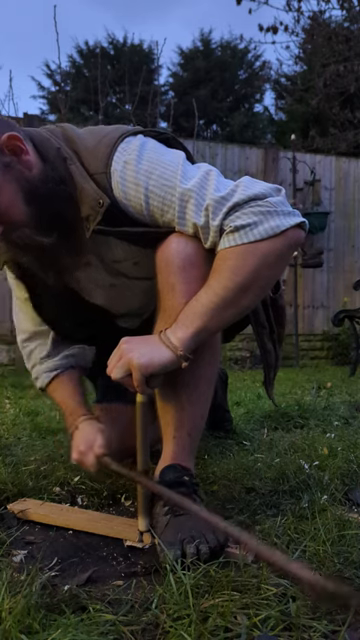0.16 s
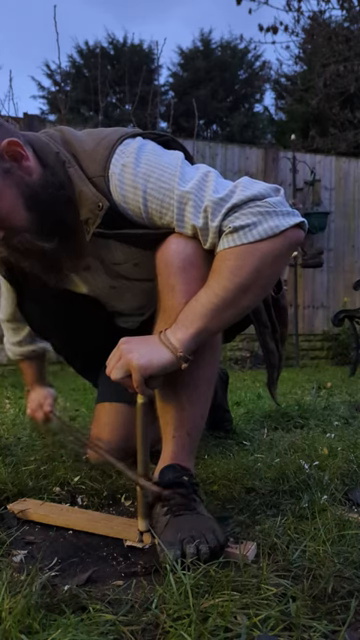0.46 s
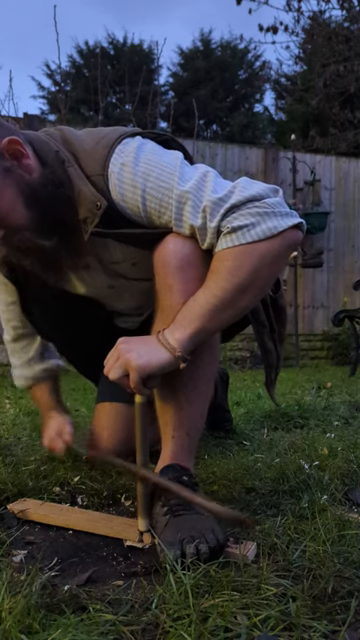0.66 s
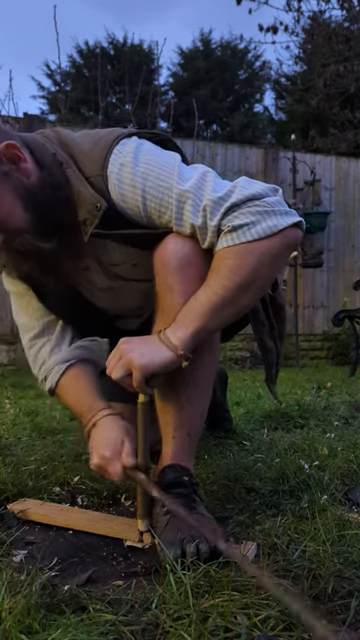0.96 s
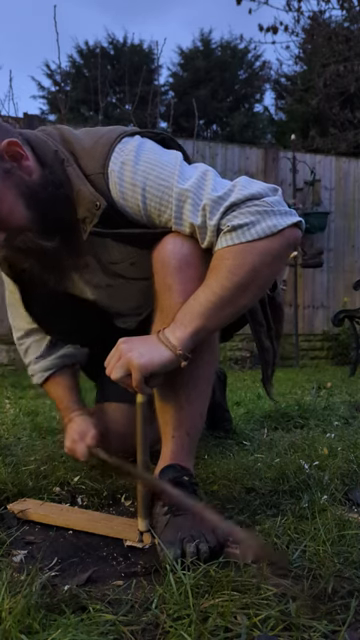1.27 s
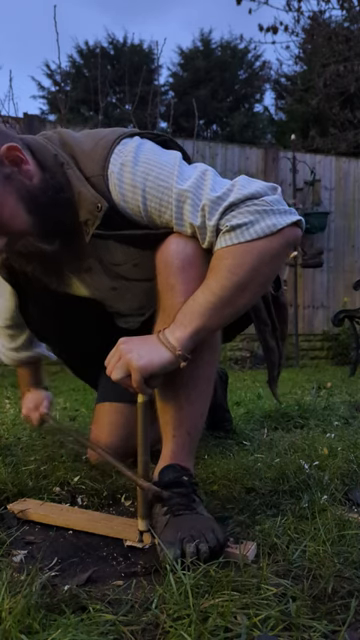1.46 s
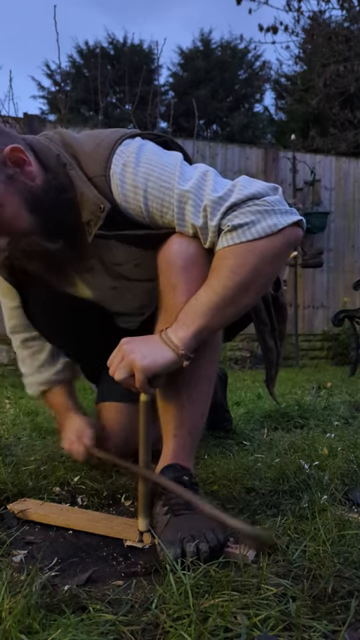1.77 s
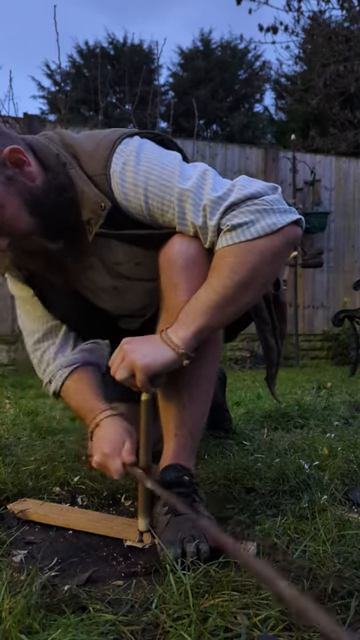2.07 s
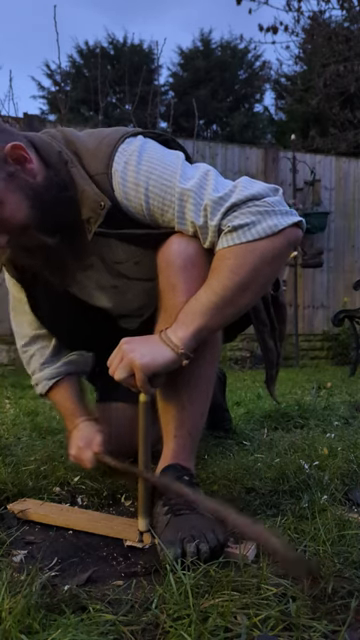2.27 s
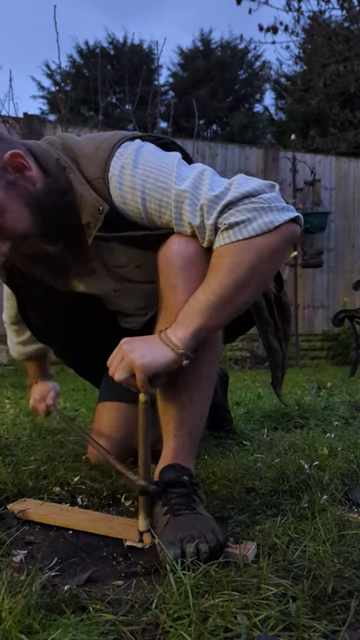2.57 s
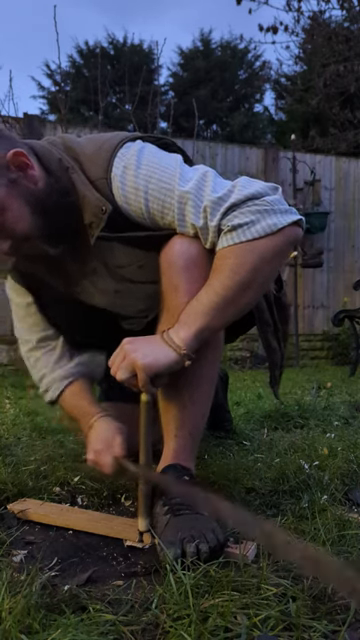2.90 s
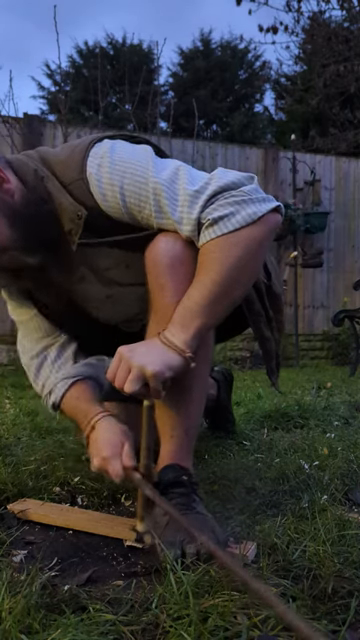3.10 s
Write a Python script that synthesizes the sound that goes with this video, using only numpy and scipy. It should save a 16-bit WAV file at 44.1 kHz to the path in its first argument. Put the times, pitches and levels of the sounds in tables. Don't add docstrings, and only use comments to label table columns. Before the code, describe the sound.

Hissing back-and-forth strokes of a spindle rubbing in a wooden notch, with rattling woody knocks

```python
import sys
import numpy as np
from scipy import signal
from scipy.fft import rfft, irfft
from scipy.io import wavfile

SR = 44100
rng = np.random.default_rng(int(sys.argv[2]) if len(sys.argv) > 2 else 0)


def nominal_scale(level):
    x = np.asarray(level, float) / 20
    return 10 ** x


def pcm_store(signal):
    levels = np.round(np.clip(np.atleast_2d(signal), -1, 1) * 32767)
    wavfile.write(sys.argv[1], SR, levels.astype(np.int16).T)


N = 142884


def at_hz(points, hz):
    table_hz, value = np.array(points)[:, :2].T
    return np.interp(np.log(hz + 1), np.log(table_hz), value)


def rms_one(x):
    return x / np.sqrt(np.mean(x ** 2) + 1e-20)


def drift(rate):
    hop, settle = 40, 2000
    r = np.exp(-2 * np.pi * rate * hop / SR)
    noise = rng.standard_normal(N // hop + settle + 2)
    slow = signal.lfilter([1], [1, -2 * r, r * r], noise)[settle:]
    return np.interp(np.arange(N) / hop, np.arange(len(slow)), rms_one(slow - slow.mean()))


def window(start, end, edge_s):
    t = np.arange(N) / SR
    opening = 1 + np.tanh((t - start) / edge_s)
    closing = 1 + np.tanh((end - t) / edge_s)
    return opening * closing / 4


# f/Hz, likeness (0 to 1)
PORT_LIKENESS = [(100, 1), (600, 0.83), (1600, 0.55), (2100, 0.4), (4100, 0.55), (5000, 0.24), (9100, 0.32),
                 (11000, 0.078)]


def patchy(sources, colour_db, patchy_db, rate):
    hz = np.fft.rfftfreq(N, 1 / SR)
    alike = np.clip(at_hz(PORT_LIKENESS, hz), 0, 1)
    shared, *own = rfft(sources)
    pair = nominal_scale(colour_db) * (np.sqrt(alike) * shared + np.sqrt(1 - alike) * np.array(own))
    place = 3 * np.log2(hz / 20 + 1e-9)
    out = 0
    for k in range(30):
        flicker = nominal_scale(patchy_db * drift(rate))
        band = np.clip(1 - abs(place - k), 0, 1)
        out = out + flicker * irfft(pair * band, N)
    return rms_one(out)


# start t/s, end t/s, hiss level/dB, swell over the stroke level/dB, rise t/s
BOW_STROKES = [
    (-.02, .53, -38, 9, 0.074),
    (.55, 1.06, -37, 2, 0.064),
    (1.05, 1.57, -37.5, 8.5, 0.047),
    (1.61, 2.12, -38, -2, 0.079),
    (2.06, 2.60, -36.5, 7.5, 0.14),
    (2.62, 3.14, -37, 3, 0.065),
    (3.145, 3.6, -42.5, -9, 0.097),
]


def bow():
    t, power = np.arange(N) / SR, np.zeros(N)
    for k, (start, end, db, swell_db, rise_s) in enumerate(BOW_STROKES):
        stop_s, stop_power = [(0.07, 1.8), (0.15, 1.3)][k % 2]
        length_s = end - start
        u = np.clip((t - start) / length_s, 0, 1)
        spin_up = np.tanh(u * length_s / rise_s) ** 1.33
        slow_down = np.tanh((1 - u) * length_s / stop_s) ** stop_power
        power += (spin_up * slow_down * nominal_scale(db + swell_db * (u - .5))) ** 2
    return np.sqrt(power)


# f/Hz, level/dB per Hz
TIP_HISS = [(250, -16.5), (900, -14), (1800, -9), (3300, -14), (5200, -11), (8000, -7.5), (10500, -12.5),
            (15500, -12)]
# f/Hz, width f/Hz, level/dB, left minus right level/dB
NOTCH_RESONANCES = [(1134, 280, 8, 0.5), (1450, 220, 8.5, -0.5), (2195, 470, 2.5, -2.5),
                    (2682, 426, 9, -5.5), (3890, 1230, 5.5, -1), (5050, 320, -3.5, -1.5),
                    (6240, 600, 4, -0.5), (6680, 590, 3.5, -8), (7610, 280, 2.5, -0.5),
                    (8810, 546, 7.5, -2), (9140, 320, -5.5, -1), (11500, 640, 3, 1), (13000, 1300, 4, 1)]


def rub(speed):
    grit_per_s, grit_share = 3500, 0.28
    hz = np.fft.rfftfreq(N, 1 / SR)
    colour_db = at_hz(TIP_HISS, hz)
    for f, width_hz, db, side_db in NOTCH_RESONANCES:
        port_db = db + side_db * np.array([[.5], [-.5]])
        colour_db = colour_db + port_db / (1 + (2 * (hz - f) / width_hz) ** 2)
    grit = rms_one((rng.random(N) < grit_per_s / SR) * rng.laplace(size=N))
    noise = rng.standard_normal((3, N))
    noise[0] += grit_share * grit
    unsteady = nominal_scale(.7 * drift(25))
    return speed * unsteady * patchy(noise, colour_db, patchy_db=1.3, rate=16)


# t/s, f/Hz, level/dB
ENGINE = [
    (0, 64.2, -50.5),
    (.5, 62.57, -52.5),
    (1.1, 65.34, -52),
    (1.7, 64.36, -50.5),
    (2.1, 62.9, -47.5),
    (2.45, 58, -51.5),
    (2.9, 54.95, -52.5),
    (3.02, 55, -64),
    (3.24, 55, -72),
]


def hum():
    s, hz, db = np.transpose(ENGINE)
    t = np.arange(N) / SR
    pitch_hz = np.interp(t, s, hz) + .9 * drift(5)
    level_db = np.interp(t, s, db) + 2.5 * drift(18)
    phase = 2 * np.pi * np.cumsum(pitch_hz) / SR
    return np.sqrt(2) * nominal_scale(level_db) * np.sin(phase)


# f/Hz, level/dB per Hz
GARDEN_AIR = [(25, -31), (45, -5), (100, -2), (300, -8), (600, -16), (1500, -20), (4000, -25.5),
              (15000, -34.5)]


def air():
    level_db = -53
    colour_db = at_hz(GARDEN_AIR, np.fft.rfftfreq(N, 1 / SR))
    return nominal_scale(level_db) * patchy(rng.standard_normal((3, N)), colour_db, patchy_db=0.9, rate=1)


def ring(clicks, hz, t60):
    r, w = nominal_scale(-60 / (t60 * SR)), 2 * np.pi * hz / SR
    return signal.lfilter([0, np.sin(w)], [1, -2 * r * np.cos(w), r * r], clicks + 1e-18)


# f/Hz, level/dB, time to fall 60 dB t/s
SPINDLE_TONES = [(648, -7.5, 0.016), (910, -9.5, 0.005), (960, -4, .015), (1140, -5, 0.015),
                 (1260, -6, 0.02), (1430, -12, 0.045), (1560, -3.5, 0.023), (2130, 7, 0.0073),
                 (2540, 2, 0.0027)]
# f/Hz, level/dB, time to fall 60 dB t/s
BOARD_TONES = [(229, -10.5, 0.076), (300.6, 0.5, 0.11), (337, 0, 0.044), (384.6, -3, 0.073),
               (566, 3, 0.044), (670, 3.5, 0.022)]
# start t/s, end t/s, spindle level/dB, low board level/dB
CHATTER_SPELLS = [
    (0.29, 0.481, -43, -63.5),
    (0.624, 0.955, -46.5, -59.5),
    (1.337, 1.518, -40, -55.5),
    (1.7, 1.97, -52, -47.5),
    (2.349, 2.558, -39, -54),
    (2.7, 2.97, -47, -47.5),
]


def chatter():
    slips_per_s, spread_db, port_scatter, edge_s = 420, 2.2, 0.17, 0.036
    strength = nominal_scale(spread_db * np.minimum(rng.exponential(size=N), 3.0))
    slips = (rng.random(N) < slips_per_s / SR) * strength
    out = 0
    for tones, level_column in ((SPINDLE_TONES, 2), (BOARD_TONES, 3)):
        rings = 0
        for hz, db, t60 in tones:
            push = rng.standard_normal(N) + port_scatter * rng.standard_normal((2, N))
            rings = rings + nominal_scale(db) * ring(slips * push, hz, t60)
        soft = signal.lfilter([1], [1, -1.5, .5625], rings)
        spells = sum(nominal_scale(row[level_column]) * window(row[0], row[1], edge_s) for row in CHATTER_SPELLS)
        out = out + rms_one(soft) * spells
    return out


# t/s, peak level/dB, f/Hz, upper tick level/dB
CLEAR_KNOCKS = [(0.299, -34, 1430, 9.5), (0.363, -29, 1200, -10), (0.427, -25.5, 1430, -5),
                (0.685, -35, 1490, -11), (0.936, -36, 1128, -14), (1.344, -24.5, 1294, 2),
                (1.372, -46, 840, -4), (1.388, -39, 1010, -8), (1.405, -44, 1020, -8),
                (1.414, -37, 1260, -8), (1.427, -24.5, 1340, -19), (1.445, -31.5, 824, 3),
                (1.479, -32.5, 1220, 6), (1.495, -23, 1260, -8), (1.757, -29, 1450, -19),
                (1.816, -29.5, 1610, -8), (1.859, -32, 1330, -4), (2.349, -32, 1140, -17),
                (2.392, -36, 1000, -6), (2.415, -29.5, 985, -1), (2.439, -25.5, 1310, -10),
                (2.451, -21.5, 1420, 1.5), (2.466, -23, 1340, -10), (2.508, -18, 1410, -19),
                (2.518, -32, 1370, -16), (2.746, -29.5, 1450, -7), (2.753, -29, 1560, -12),
                (2.795, -30, 1430, -12), (2.834, -24.5, 1500, -14), (2.874, -25, 1390, -8)]


def knocks():
    gain_db, cycles, tick_hz = 2.94, 3.97, 2500
    out = np.zeros(N)
    start_phases = rng.uniform(0, 2 * np.pi, len(CLEAR_KNOCKS))
    t = np.arange(int(0.011 * SR)) / SR
    for (s, db, hz, tick_db), phase in zip(CLEAR_KNOCKS, start_phases):
        u = t * hz / cycles * 6.0
        swell = (u / 2) ** 2 * np.exp(2 - u)
        body = swell * np.sin(2 * np.pi * hz * t + phase)
        tick_swell = (t / 0.00093 * np.exp(1 - t / 0.00076)) ** 2
        tick = nominal_scale(tick_db) * tick_swell * np.sin(2 * np.pi * tick_hz * t)
        first = int(s * SR)
        out[first:first + len(t)] += nominal_scale(db + gain_db) * (body + tick)
    return out


# start t/s, end t/s, level over the hiss level/dB, low edge f/Hz
PRESSURE_SURGE = (2.965, 3.09, 2, 7500)


def brush(hiss):
    start, end, db, low_hz = PRESSURE_SURGE
    bright = signal.sosfiltfilt(signal.butter(1, low_hz, "high", fs=SR, output="sos"), hiss)
    return nominal_scale(db) * window(start, end, 0.009) * bright


# f/Hz, left minus right level/dB
PORT_LEVELS = [(100, 2), (400, -3), (1500, -3), (4000, -2.5), (6500, -4.5), (9000, 1), (15000, 1)]
# f/Hz, lag in radians
PORT_LAG = [(60, -0.5), (900, 0.8), (1900, 2.0), (2750, 1.52), (3150, 3.5), (5100, 3.5), (6600, 6),
            (9000, 5.5)]


def ports(x):
    hz = np.fft.rfftfreq(N, 1 / SR)
    half_db = at_hz(PORT_LEVELS, hz) / 2
    left = nominal_scale(half_db) * np.exp(-1j * at_hz(PORT_LAG, hz))
    right = nominal_scale(-half_db)
    return irfft(rfft(x) * [left, right], N)


def scene():
    hiss = rub(bow())
    drill = hiss + brush(hiss) + chatter() + knocks()
    return ports(drill) + hum() + air()


def band_limit(x):
    return signal.sosfilt(signal.butter(12, 16250, fs=SR, output="sos"), x)


def record(dry):
    cut = signal.sosfilt(signal.ellip(14, .5, 70, 15730, fs=SR, output="sos"), dry)
    cut = signal.sosfilt(signal.butter(4, 48.0, "high", fs=SR, output="sos"), cut)
    return band_limit(cut)


dry = scene()
out = record(dry)
pcm_store(out)
```